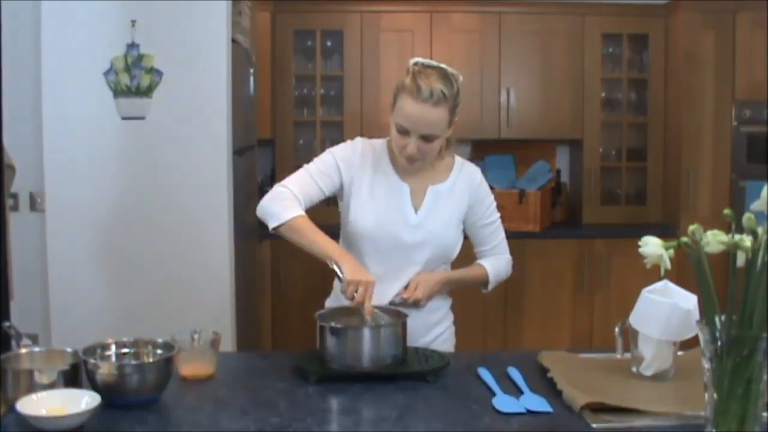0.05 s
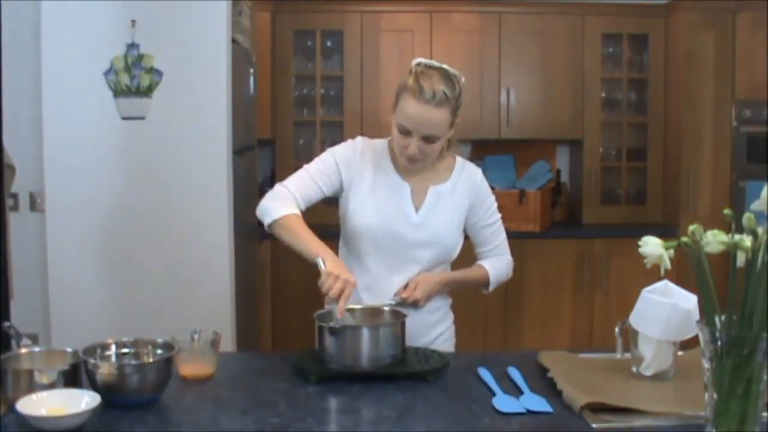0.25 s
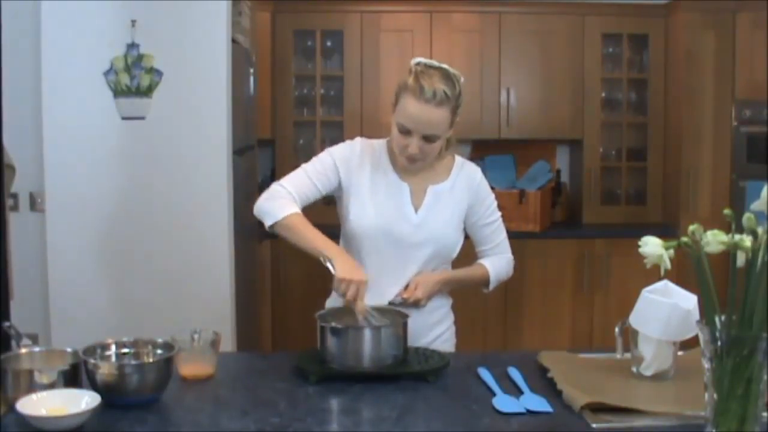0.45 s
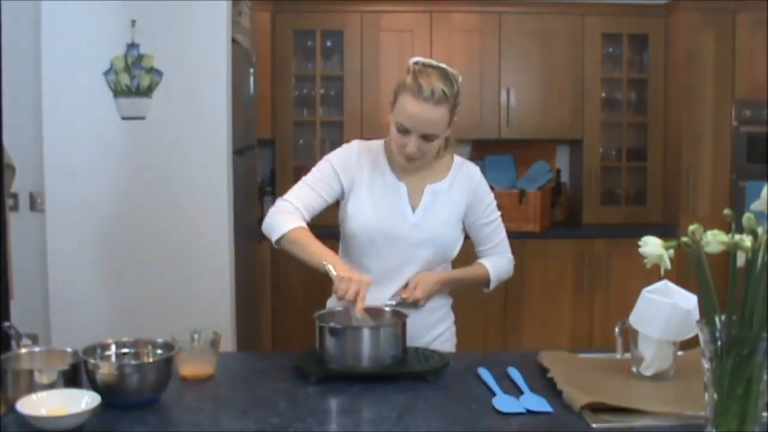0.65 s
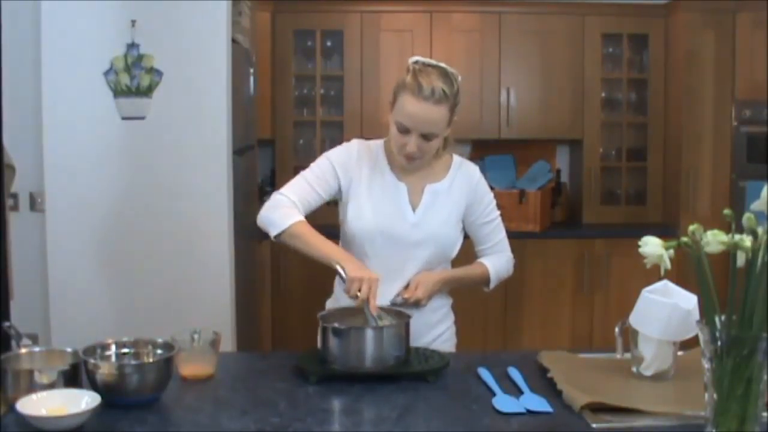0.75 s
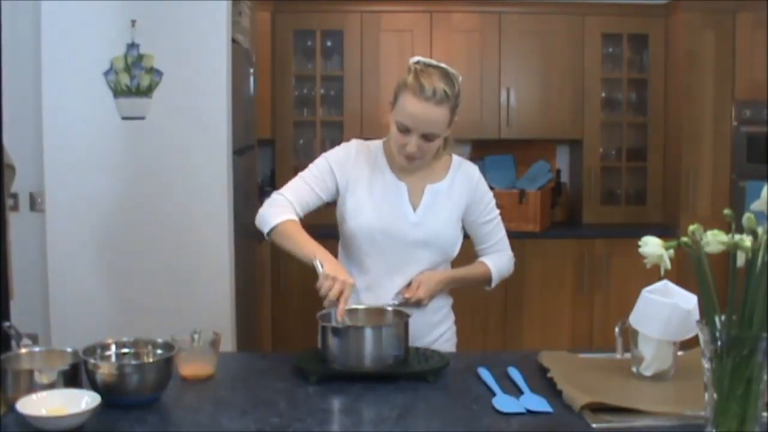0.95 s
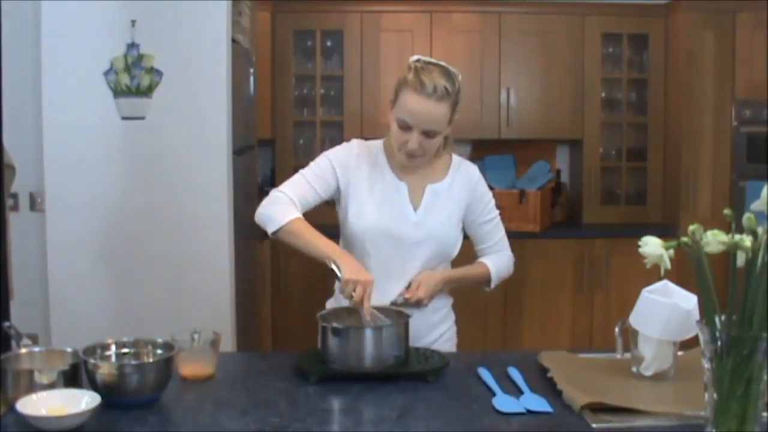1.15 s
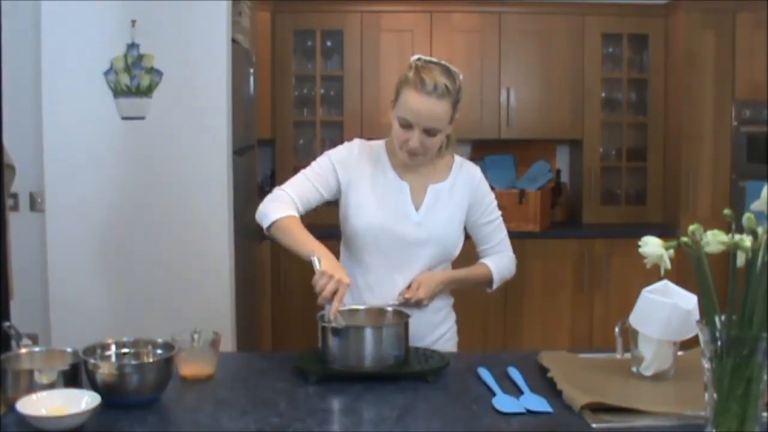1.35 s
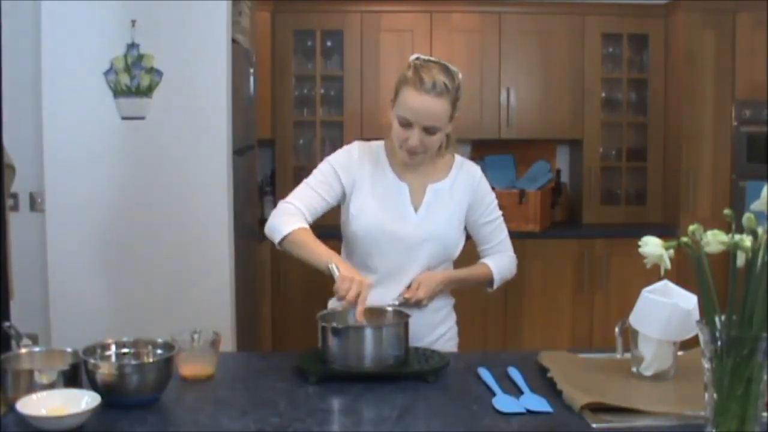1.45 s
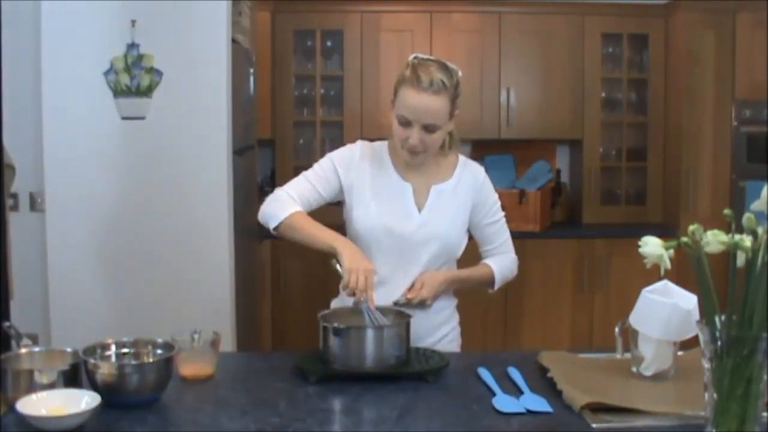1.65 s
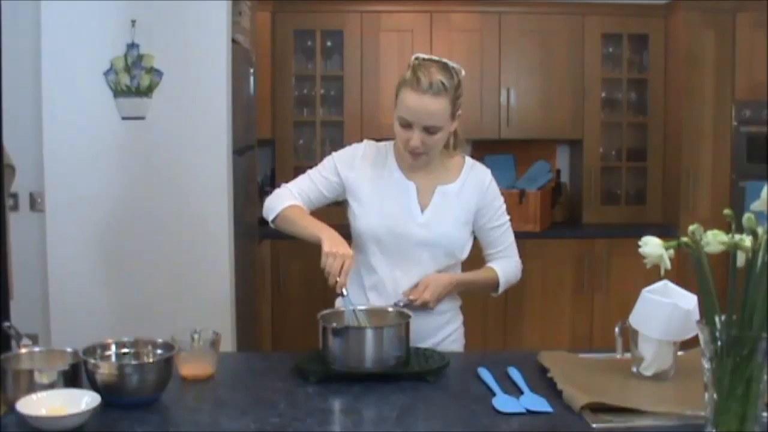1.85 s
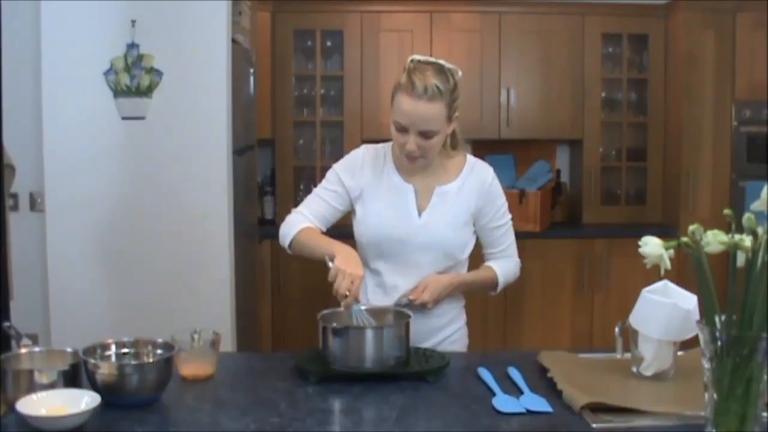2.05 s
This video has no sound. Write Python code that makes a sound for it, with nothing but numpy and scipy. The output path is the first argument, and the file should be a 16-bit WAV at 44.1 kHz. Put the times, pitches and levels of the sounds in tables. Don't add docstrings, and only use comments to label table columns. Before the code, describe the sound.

Hard metallic whisk blows ring a steel pan over squelching dough, soft thuds and low room hum

```python
import sys
import numpy as np
from scipy import signal
from scipy.fft import rfft, irfft
from scipy.io import wavfile
from scipy.ndimage import uniform_filter1d

SR = 44100
rng = np.random.default_rng(int(sys.argv[2]) if len(sys.argv) > 2 else 0)


def rack_gain(trim_db):
    fader = np.asarray(trim_db, float)
    return 10 ** (fader / 20)


def file_out(sig):
    cols = np.atleast_2d(sig).T
    lim = np.clip(cols, -1, 1)
    pcm = np.round(lim * 32767).astype(np.int16)
    wavfile.write(sys.argv[1], SR, pcm)


N = 92610

# pitch_hz, density_db
HUSH_COLOUR = [(15, -30), (30, -4.5), (41, -8), (60, -11), (103, -3), (140, -6.5), (363, -7.5), (734, -14),
               (840, -6), (962, -9.5), (1740, -19), (2110, -14), (16000, -39)]
# pitch_hz, side_db
HUSH_SIDE_LEVEL = [(60, -38), (240, -18), (950, -8.5), (3770, -5.5), (15000, -7)]
# time_s, level_db
ARM_EFFORT = [(0.0, -22.5), (0.2, -30), (0.43, -22), (0.65, -31.5), (1.49, -31), (1.908, -55), (2.1, -80)]
# pitch_hz, density_db
SQUELCH_COLOUR = [(40, -24), (80, -15), (103, -4), (135, -21), (300, -5), (800, -13.5), (2000, -12),
                  (6000, -16), (12000, -60)]
# start_s, length_s, level_db, lowest_hz, highest_hz
WIRE_DRAGS = [(-.1, 0.65, -44.5, 1500, 11000), (0.275, 0.059, -35.5, 6000, 14000),
              (0.4, 0.013, -43, 4000, 12000), (0.726, 0.12, -44.5, 5000, 12600),
              (0.751, 0.049, -27.5, 1100, 1880), (0.861, 0.15, -31.5, 1810, 5440),
              (1.179, 0.03, -38.5, 7000, 12700), (1.755, 0.011, -27.5, 6000, 13000),
              (.988, 0.059, -31.5, 1500, 6960), (1.196, 0.086, -29, 1220, 1940),
              (0.302, 0.074, -33, 1500, 4960)]
# start_s, peak_db, dullness_hz, favoured_hz
PAN_THUDS = [(0.2, -9.5, 790, 555), (0.322, -13, 1000, 604), (0.438, -24, 940, 700),
             (0.509, -14.5, 980, 615), (0.752, -50, 900, 705), (0.789, -14, 1050, 486),
             (0.919, -15.5, 972, 535), (1.185, -16, 900, 533), (1.269, -13, 920, 550),
             (1.552, -15.5, 970, 600), (1.751, -18, 730, 360), (1.788, -24, 705, 350)]
# pitch_hz, level_db, t60_s
BASE_MODES = [(100, -9, .1), (173.7, 0, 0.12), (229.3, -2.5, 0.19), (271, -3.5, 0.11), (369, -9, 0.088),
              (445, -11.5, 0.067), (566.4, -2, 0.11), (672, 1, 0.05), (756.6, -3.5, 0.13), (792, -2, 0.11),
              (1122, 12.5, 0.018), (1229, 17, 0.06), (1540, -9, 0.053)]
# start_s, length_s, pitch_hz, level_db
STEEL_SINGS = [(.205, 0.074, 697.5, -21.5), (.215, 0.045, 166, -20.5), (.315, 0.023, 688, -16.5),
               (.45, 0.096, 1236, -22.5), (.455, 0.059, 4590, -25), (.51, 0.05, 737, -21.5),
               (.51, 0.032, 565, -22), (.53, 0.028, 4640, -21), (.59, 0.061, 3740, -26),
               (.62, 0.13, 445, -32), (.79, 0.044, 344.3, -21.5), (.87, 0.12, 4970, -25.5),
               (.87, 0.11, 2208, -26.5), (.91, 0.012, 592, -36), (1.2, 0.039, 1066, -22),
               (1.2, 0.043, 4960, -35), (1.265, 0.037, 2980, -23), (1.27, 0.05, 592, -31),
               (1.372, 0.038, 1980, -12), (1.385, 0.026, 2986, -12), (1.428, 0.024, 2986, -15),
               (1.41, 0.031, 1117, -23), (1.555, 0.025, 1135, -14.5), (1.58, 0.047, 2014, -18),
               (1.58, 0.078, 4440, -22), (1.585, 0.048, 4960, -19), (1.63, 0.043, 2990, -26),
               (1.66, 0.043, 2010, -24), (1.61, .04, 1147, -28), (1.752, 0.018, 3700, -25),
               (.436, 0.018, 4600, -20), (.475, .03, 4610, -16), (1.56, .03, 4060, -19)]
# start_s, length_s, pitch_hz, level_db
COUNTER_SHOVES = [(.335, 0.074, 105, -31), (0.95, 0.032, 112, -35), (.5, 0.09, 225, -25),
                  (0.71, 0.084, 112, -32.5), (0.74, 0.13, 110, -34), (1.04, 0.075, 124.5, -32),
                  (0.85, 0.03, 270, -24), (1.2, 0.054, 107, -38.5), (1.4, 0.11, 220, -33),
                  (1.4, 0.11, 97, -33), (0.23, 0.029, 480, -28.5), (1.19, 0.046, 400, -24.5),
                  (1.5, 0.047, 148, -31.5), (1.5, 0.044, 215, -37.5), (1.86, 0.054, 470, -37)]
# start_s, peak_db, ring_db, favoured_hz, brightness_db
WALL_BLOWS = [
    (0.217, -11.5, -7.5, 3860, -17),
    (0.4023, -19.5, -1, 4500, 12.5),
    (0.4366, 0, -4, 4300, 7),
    (.5725, -10.5, -22, 3700, -18),
    (0.8562, -5, -3, 4850, 3.5),
    (.994, -10, -23, 3960, -15),
]
# start_s, peak_db, ring_db, favoured_hz, brightness_db
RIM_BLOWS = [
    (1.1975, -3.5, -2.5, 4000, -4),
    (1.274, -16, 5, 2930, -9),
    (1.3503, 0.5, -4, 2720, 8.5),
    (1.3842, -8, 2, 2800, 4),
    (1.430, -30, -7, 2950, 3),
    (1.5498, 1, -3.5, 2280, -3),
    (1.588, -16.5, 10, 2190, -7),
    (1.7478, -10.5, -6.5, 3500, 0),
]
# pitch_hz, level_db, t60_s
WALL_MODES = [(740, -1, .08), (1242, 7, 0.12), (1630, 3, 0.049), (2260, 2, 0.064), (2774, 7, 0.022),
              (3300, -15, .04), (3950, -17, 0.037), (4500, 0, 0.029), (4640, -2, 0.036), (4400, -14, 0.03),
              (5100, -31, 0.025), (5260, -40, .03), (6430, -26, 0.035), (8800, -23, 0.028)]
# pitch_hz, level_db, t60_s
RIM_MODES = [(1065, -5, 0.076), (1110, 2.5, 0.079), (1944, -4, 0.045), (2040, 2, 0.044), (2465, -5, 0.042),
             (2986, 0, 0.052), (3670, -20, 0.02), (3655, -1.5, 0.019), (4130, -1, 0.025),
             (4500, 3.5, 0.022), (4925, 5, 0.02), (5400, -4, 0.02), (7500, -22, 0.009), (3250, -31, 0.089)]
# pitch_hz, density_db
WALL_CRACK_COLOUR = [(200, -39), (400, -7.5), (1200, -3.5), (2200, 0), (3200, -5), (4800, 1.5), (6000, -12),
                     (10000, -21), (15000, -37)]
# pitch_hz, density_db
RIM_CRACK_COLOUR = [(150, -38), (400, -12.5), (1100, -6.5), (2000, -6.5), (3300, -11), (4800, 2),
                    (6000, -13.5), (10000, -20), (15000, -52)]
# pitch_hz, t60_s, wet_db, side_db
ROOM_DECAY = [(49, 1, 8.5, -20), (147, 0.69, 6, -23), (517, 0.58, 7, -9.5), (1500, 0.66, 1, -6.5),
              (4500, 0.42, 2.5, -17.5), (8100, 0.51, -6, -3), (14000, 0.054, 0.5, -14)]
# pitch_hz, left_lead_rad
PORT_LEAD = [(0, 0), (600, -0.38), (5860, -0.24), (15900, -0.53)]

HUSH_DB = -36
GRAINS_PER_S = 9500
THUD_DB, PUFF_DB, PUFF_T60_S, THUD_RISE_S = -11.5, 12, 0.089, 0.0059
SING_WANDER_RAD, SING_WANDER_HZ = 1.2, 70
CLATTER_S, WIRE_LOSS_DB, FAVOUR_DB_PER_OCT2 = .015, 15, 6.5
CRACK_DB, CRACK_T60_S, CRACK_TOP_HZ, CONTACT_RISE_S = -2, 0.0085, 6000, 0.0031
RING_DB, LONGEST_RING_S = -8.5, .17
RATTLES_PER_S, RATTLE_DB, RATTLE_T60_S, RATTLE_LOW_HZ, RATTLE_TOP_HZ = 710, -26.5, 0.37, 3500, 10930
FIRST_ECHO_S, BUILD_S = 0.00043, 0.012
KNEE_DB, SQUEEZE_DB_PER_DB, RELEASE_DB_PER_S, ATTACK_S = -11, 0.23, 25.5, 0.0037
PEAK_CEILING = .92


def rms_one(x):
    return x / np.sqrt(np.mean(x ** 2) + 1e-20)


def at_hz(points, hz, order=1):
    p = np.array(points)
    return np.interp(np.log(np.maximum(hz, 1)), np.log(p[:, 0]), p[:, order])


def cut(x, hz, kind, order=2):
    sos = signal.butter(order, np.clip(hz, 20, .45 * SR), kind, fs=SR, output="sos")
    return signal.sosfilt(sos, x)


def tint(x, points):
    hz = np.arange(len(x) // 2 + 1) * SR / len(x)
    return irfft(rfft(x) * rack_gain(at_hz(points, hz)), len(x))


def evened(x, size):
    f = rfft(x)
    power = uniform_filter1d(abs(f) ** 2, size=size)
    return irfft(f * np.sqrt(power.mean() / power), len(x))


def ring(clicks, hz, t60):
    r, w = rack_gain(-60 / (max(t60, .01) * SR)), 2 * np.pi * hz / SR
    return signal.lfilter([0, np.sin(w)], [1, -2 * r * np.cos(w), r * r], clicks + 1e-18)


def add(out, s, x):
    i = int(s * SR)
    x = x[max(-i, 0):N - i]
    out[max(i, 0):max(i, 0) + len(x)] += x


def hush():
    hz = np.arange(N // 2 + 1) * SR / N
    colour_db = at_hz(HUSH_COLOUR, hz) + [[0], [1]] * at_hz(HUSH_SIDE_LEVEL, hz)
    mid, side = irfft(rfft(rng.standard_normal((2, N))) * rack_gain(colour_db), N)
    return rack_gain(HUSH_DB) / np.std(mid) * (mid + side * [[1], [-1]])


def dough():
    s, db = np.transpose(ARM_EFFORT)
    noise = rng.standard_normal(N)
    swell = rms_one(cut(rng.standard_normal(N), 26.4, "low"))
    lumps = noise * rack_gain(6.0 * np.clip(swell, -3, 1.3))
    return rack_gain(np.interp(np.arange(N) / SR, s, db) - 15.0) * rms_one(tint(lumps, SQUELCH_COLOUR))


def drags():
    out = np.zeros(N)
    for s, length, db, low_hz, high_hz in WIRE_DRAGS:
        u = np.arange(SR // 2) / SR / length
        slips = rack_gain(4.4 * np.minimum(rng.exponential(1, len(u)), 5))
        slips = slips * rng.choice([-1, 1], len(u))
        slips = slips * (rng.random(len(u)) < GRAINS_PER_S / SR)
        stroke = np.clip(8 * u, 0, 1) * np.exp(-1.5 * u ** 2)
        scrape = cut(cut(slips, low_hz, "high"), high_hz, "low")
        add(out, s, rack_gain(db) * stroke * rms_one(scrape))
    return out


def puff():
    t = np.arange(SR // 5) / SR
    swell = rack_gain(-60 * t / PUFF_T60_S) * (1 - np.exp(-t / THUD_RISE_S))
    return evened(rng.standard_normal(SR // 5) * swell, size=20)


def thuds():
    out = np.zeros(N)
    for s, db, dull_hz, favour_hz in PAN_THUDS:
        push = np.zeros(SR // 3)
        push[:24] = signal.windows.hann(24) / 12
        octaves = np.log2(np.array(BASE_MODES)[:, 0] / favour_hz)
        luck_db = rng.normal(0, 4.2, len(BASE_MODES)) - 3 * octaves ** 2
        body = np.zeros(len(push))
        for k, (hz, level_db, t60) in enumerate(BASE_MODES):
            body += (-1) ** k * rack_gain(level_db + luck_db[k]) * ring(push, hz, t60)
        add(out, s - .002, rack_gain(db + THUD_DB) * cut(body, dull_hz, "low"))
        dull = cut(cut(puff(), dull_hz, "low"), 0.5 * favour_hz, "high")
        add(out, s - .002, rack_gain(db + PUFF_DB) * dull)
    return out


def sings(rows):
    out = np.zeros(N)
    for s, length, hz, db in rows:
        t = np.arange(SR // 4) / SR
        wander = cut(rng.standard_normal(len(t)), min(SING_WANDER_HZ, hz / 8), "low")
        jostle = SING_WANDER_RAD * rms_one(wander)
        u = t / max(length, .005)
        swell = np.clip(4 * u, 0, 1) * np.exp(-1.2 * u ** 3)
        add(out, s, rack_gain(db) * swell * np.sin(2 * np.pi * hz * t + jostle))
    return out


def clatter(hits, modes, colour):
    steel, cracks = np.zeros(N), np.zeros(N)
    t = np.arange(SR // 4) / SR
    for s, db, ring_db, favour_hz, bright_db in hits:
        share = np.sort(rng.random(30)) ** 1.1
        clicks = np.zeros(SR // 4)
        clicks[((share - share[0]) * CLATTER_S * SR).astype(int)] = rack_gain(-WIRE_LOSS_DB * share)
        fade = rack_gain(-60 / (CRACK_T60_S * SR))
        grit = signal.lfilter([1], [1, -fade], clicks) * rng.standard_normal(SR // 4)
        grit = evened(grit, size=60) * (1 - np.exp(-t / CONTACT_RISE_S)) * (t < .1)
        bright = (rack_gain(bright_db) - 1) * cut(grit, CRACK_TOP_HZ, "high")
        add(cracks, s - .001, rack_gain(db + CRACK_DB) * (grit + bright))
        for (hz, level_db, t60), wire in zip(modes, rng.integers(1, 8, len(modes))):
            click = clicks * (np.cumsum(clicks > 0) == wire)
            miss_db = FAVOUR_DB_PER_OCT2 * np.log2(hz / favour_hz) ** 2
            gain = rack_gain(db + RING_DB + ring_db + level_db - miss_db)
            add(steel, s - .001, gain * ring(click, hz, min(t60, LONGEST_RING_S)))
    return cut(steel, 450, "high") + tint(cracks, colour)


def rattle(hits):
    stir = np.zeros(N)
    for s, db, *_ in hits:
        add(stir, s + 0.0033, rack_gain(db - 60 * np.arange(SR // 2) / SR / RATTLE_T60_S))
    clumps = rack_gain(6.7 * rms_one(cut(rng.standard_normal(N), 70, "low")))
    ticks = rack_gain(8.1 * np.minimum(rng.exponential(1, N), 4)) * rng.choice([-1, 1], N)
    ticks = ticks * (rng.random(N) < RATTLES_PER_S * clumps / SR)
    dealt = rng.integers(0, 16, N)
    rings = np.zeros(N)
    for k, hz in enumerate(np.geomspace(RATTLE_LOW_HZ, RATTLE_TOP_HZ, 16)):
        rings += ring(ticks * (dealt == k), hz, 0.013) * 4000 / hz
    return rack_gain(RATTLE_DB) * stir * rms_one(cut(rings, 2150, "high"))


def kitchen(x):
    t = np.arange(SR) / SR
    white, tail = rng.standard_normal((2, 2, SR)), 0
    onset = 1 - np.exp(-np.maximum(t - FIRST_ECHO_S, 0) / BUILD_S)
    for k, hz in enumerate(45 * 2. ** np.arange(9)):
        octave = signal.butter(2, [hz / np.sqrt(2), hz * np.sqrt(2)], "band", fs=SR, output="sos")
        mid, side = signal.sosfilt(octave, white[k % 2])
        fade = onset * rack_gain(-60 * t / at_hz(ROOM_DECAY, hz))
        fade = fade / np.sqrt(np.sum(fade ** 2)) * rack_gain(at_hz(ROOM_DECAY, hz, order=2))
        tail = tail + fade * (mid + rack_gain(at_hz(ROOM_DECAY, hz, order=3)) * side * [[1], [-1]])
    f = rfft(tail)
    power = np.mean(abs(f) ** 2, axis=0)
    level = np.sqrt(uniform_filter1d(power, size=250) / uniform_filter1d(power, size=25))
    tail = irfft(f * level, SR)
    return signal.fftconvolve(x[None], tail[:, :SR * 3 // 4], axes=1)[:, :N]


def scene():
    pan = clatter(RIM_BLOWS, RIM_MODES, RIM_CRACK_COLOUR)
    pan = pan + clatter(WALL_BLOWS, WALL_MODES, WALL_CRACK_COLOUR)
    pan = pan + thuds() + drags() + dough() + rattle([*RIM_BLOWS, *WALL_BLOWS])
    sung = sings(STEEL_SINGS) + sings(COUNTER_SHOVES)
    air = rfft(pan + sung + rack_gain(1.0) * kitchen(pan + rack_gain(-13.0) * sung))
    lead_rad = at_hz(PORT_LEAD, np.arange(N // 2 + 1) * SR / N)
    return irfft(air * np.exp(.5j * lead_rad * [[1], [-1]]), N) + hush()


def roll_off(x):
    return signal.sosfilt(signal.butter(12, 16000, fs=SR, output="sos"), x)


def record(dry):
    level_db = 10 * np.log10(uniform_filter1d(np.mean(dry ** 2, axis=0), size=256) + 1e-12)
    slope_db = RELEASE_DB_PER_S * np.arange(N) / SR
    held_db = np.maximum.accumulate(level_db + slope_db) - slope_db
    over_db = np.maximum(held_db - KNEE_DB, 0)
    r = np.exp(-1 / (ATTACK_S * SR))
    x = dry * rack_gain(-SQUEEZE_DB_PER_DB * signal.lfilter([1 - r], [1, -r], over_db))
    x = x / (1 + (cut(x, 20, "high") / PEAK_CEILING) ** 4) ** .25
    x = signal.sosfilt(signal.cheby2(8, 60, 17200, fs=SR, output="sos"), x)
    return roll_off(x)


dry = scene()
out = record(dry)
file_out(out)
```